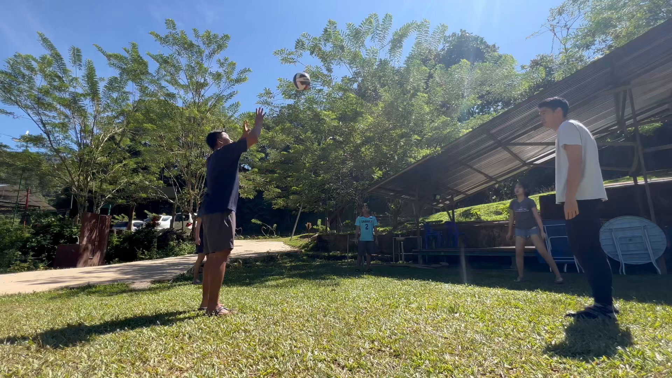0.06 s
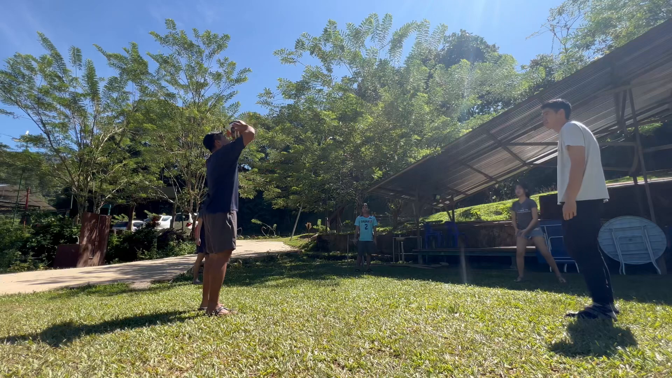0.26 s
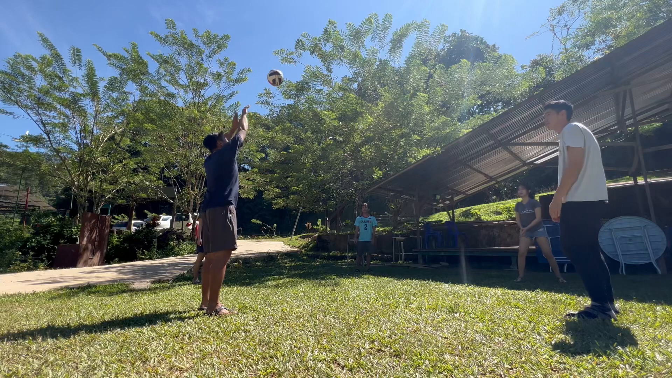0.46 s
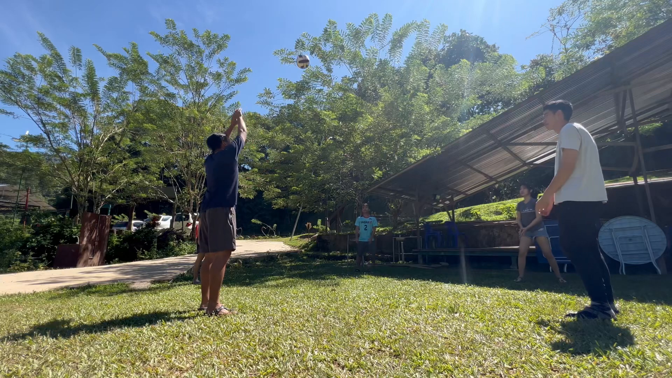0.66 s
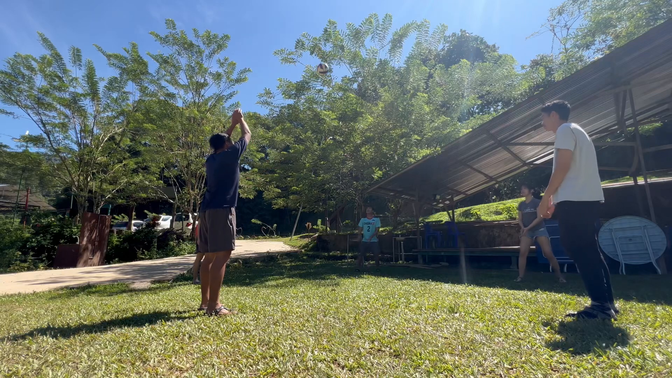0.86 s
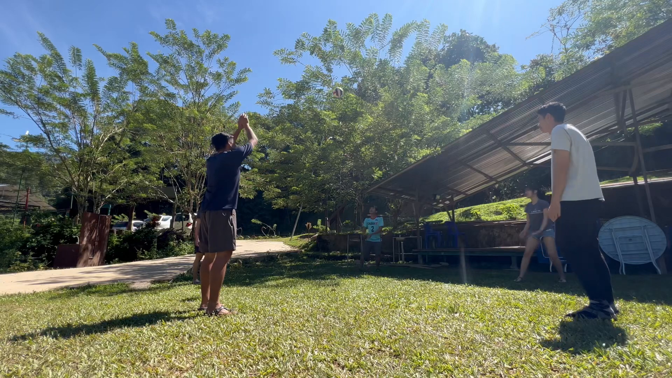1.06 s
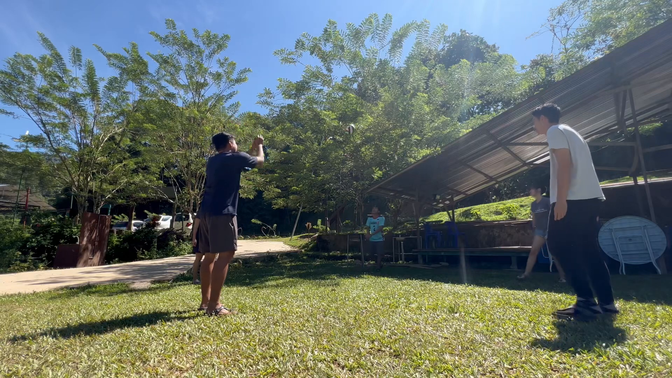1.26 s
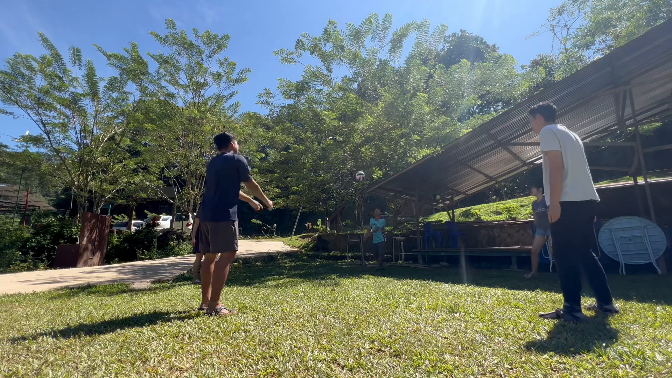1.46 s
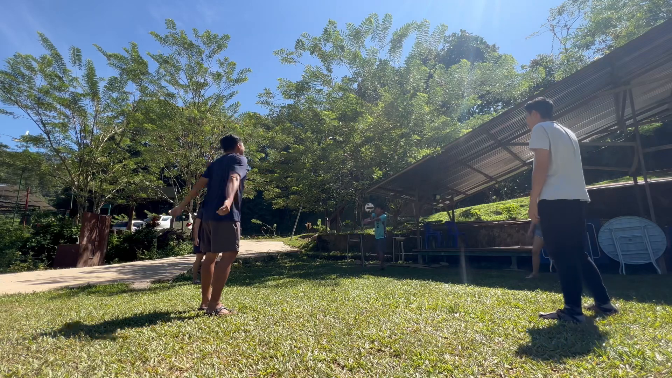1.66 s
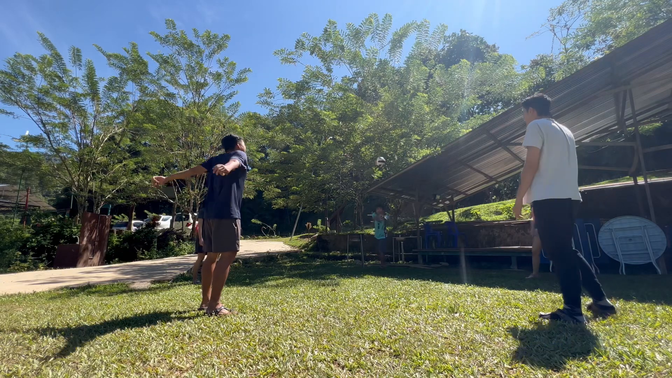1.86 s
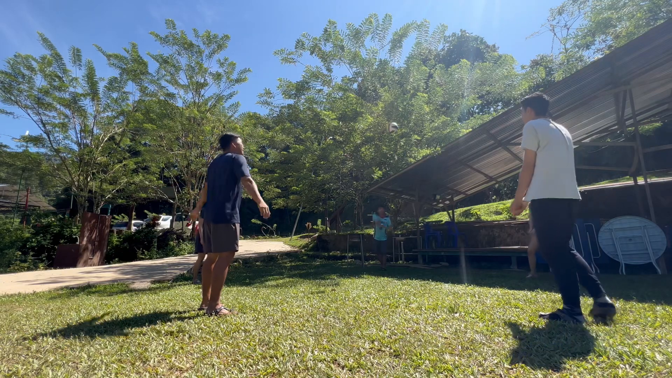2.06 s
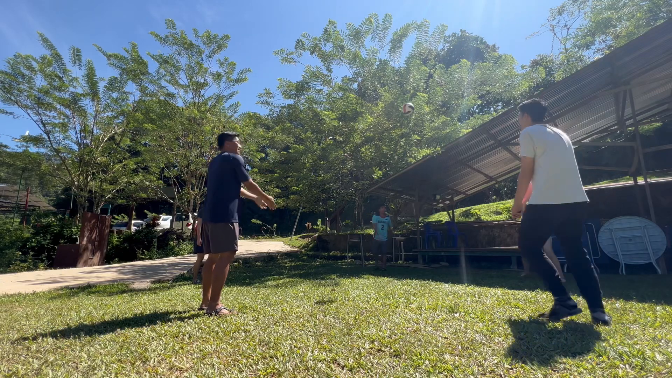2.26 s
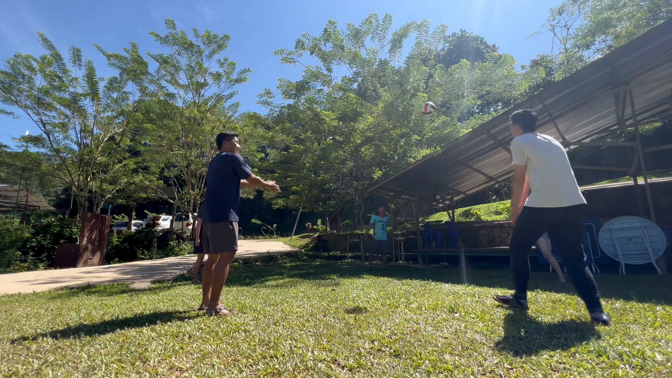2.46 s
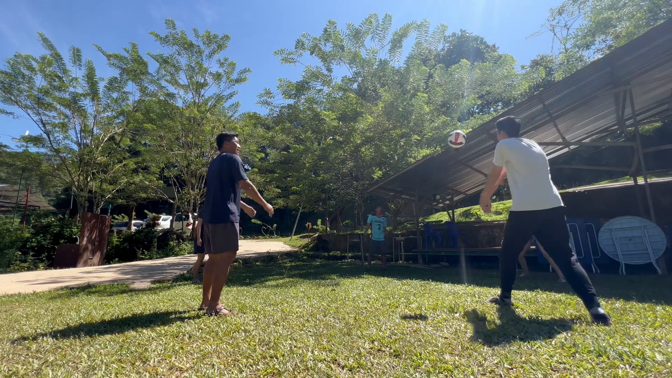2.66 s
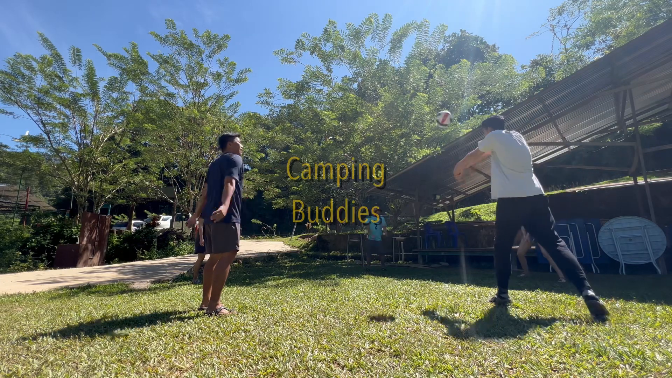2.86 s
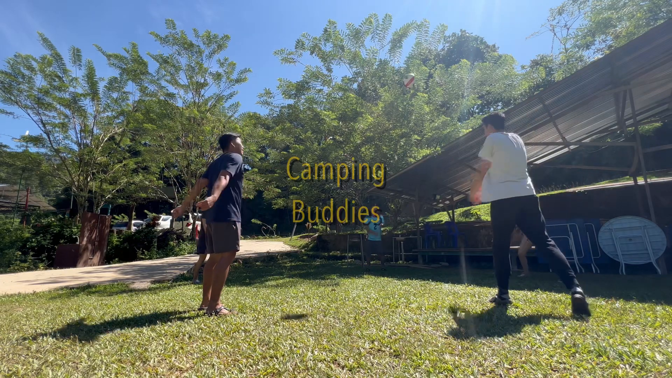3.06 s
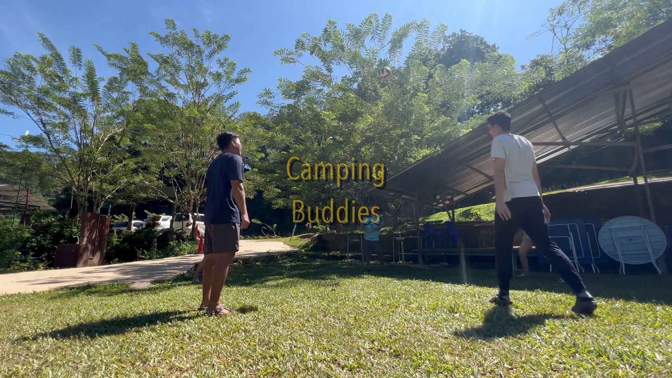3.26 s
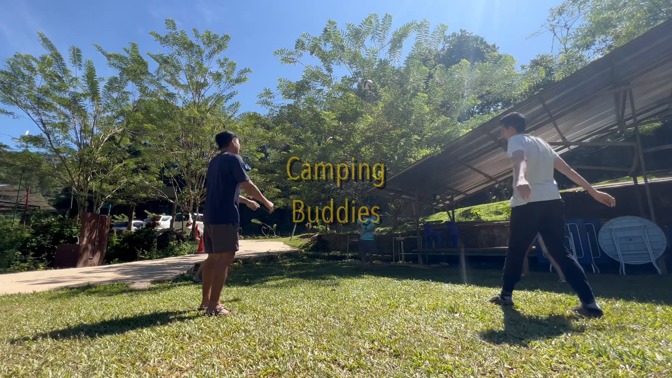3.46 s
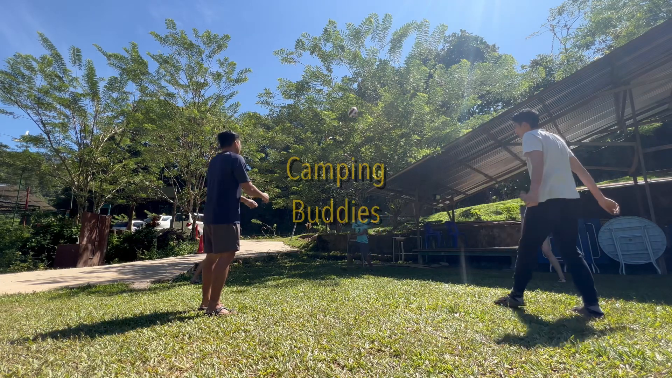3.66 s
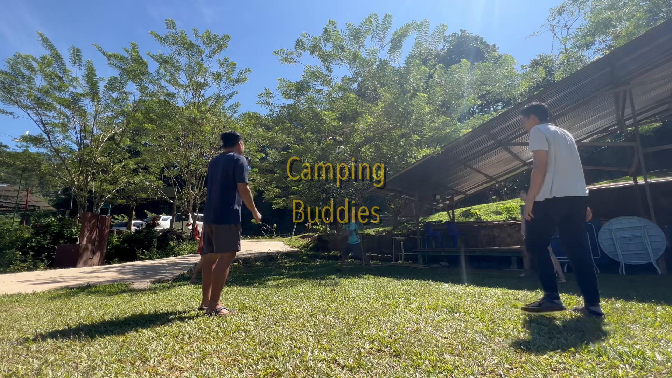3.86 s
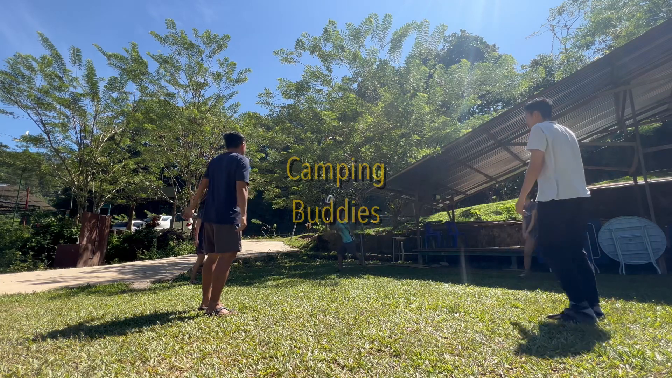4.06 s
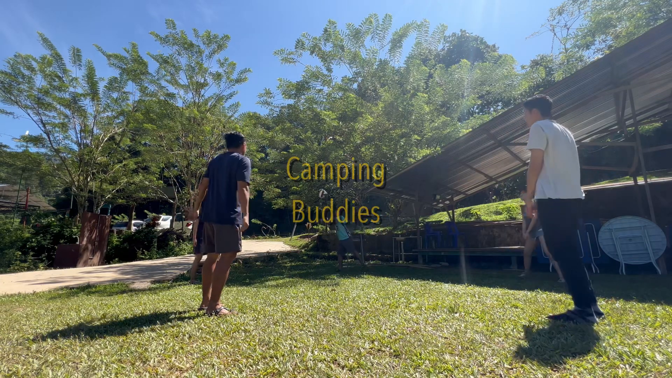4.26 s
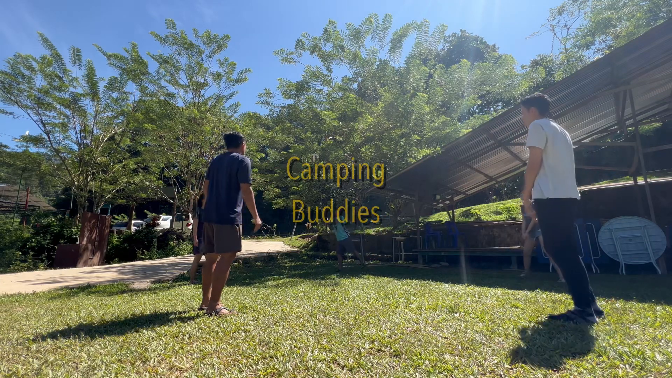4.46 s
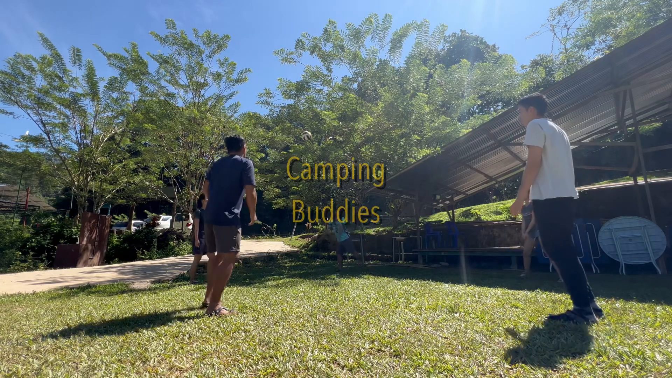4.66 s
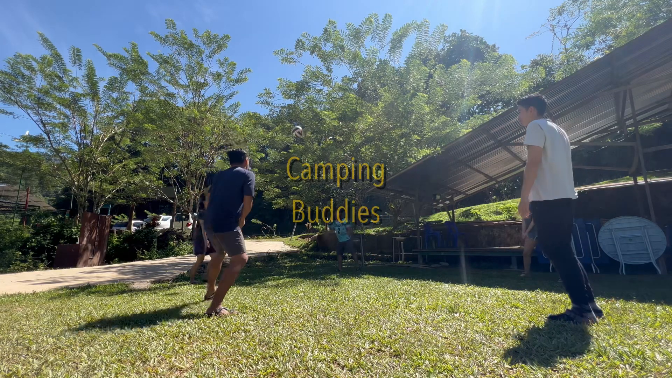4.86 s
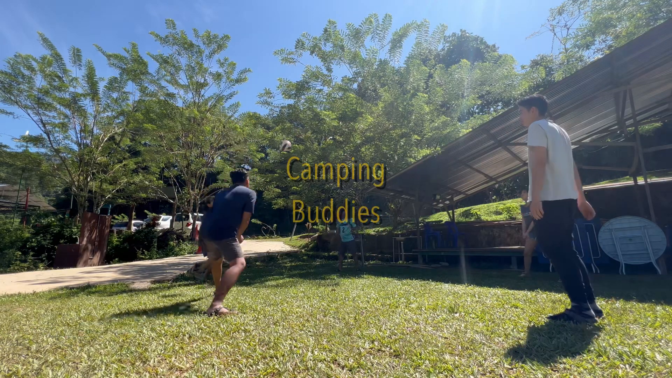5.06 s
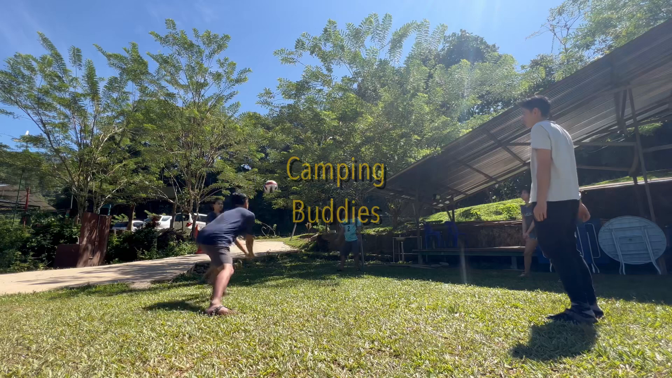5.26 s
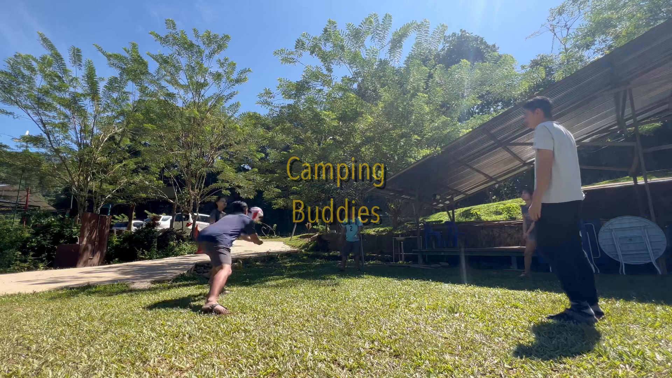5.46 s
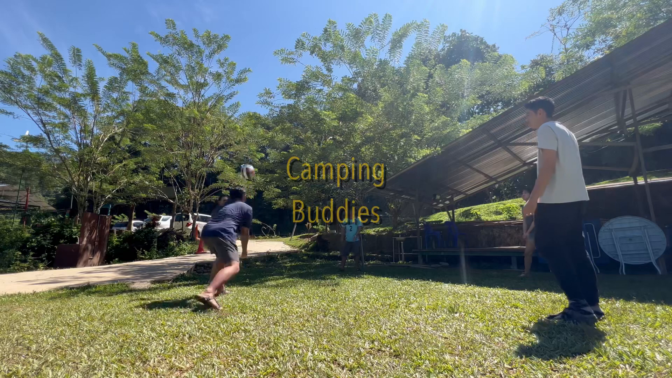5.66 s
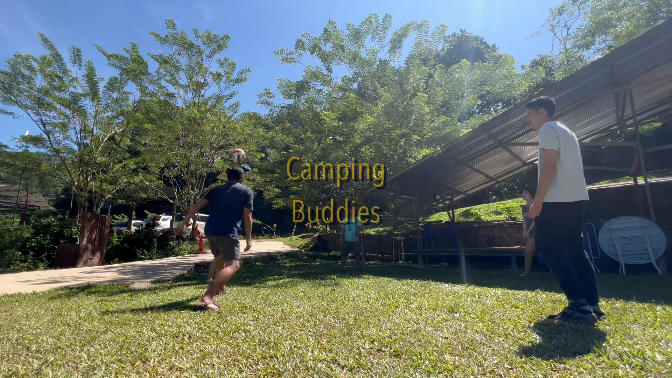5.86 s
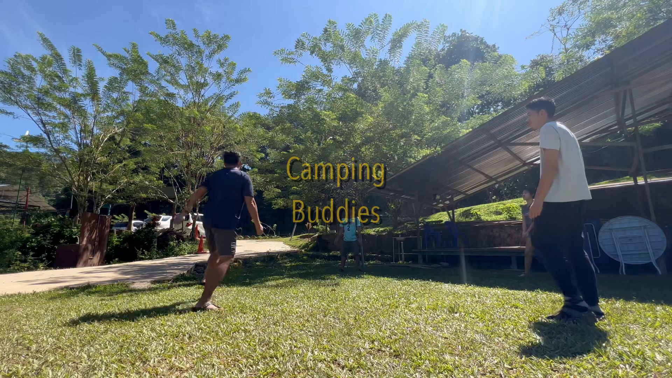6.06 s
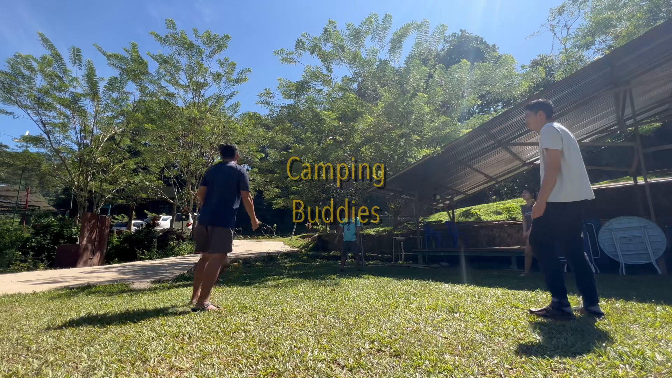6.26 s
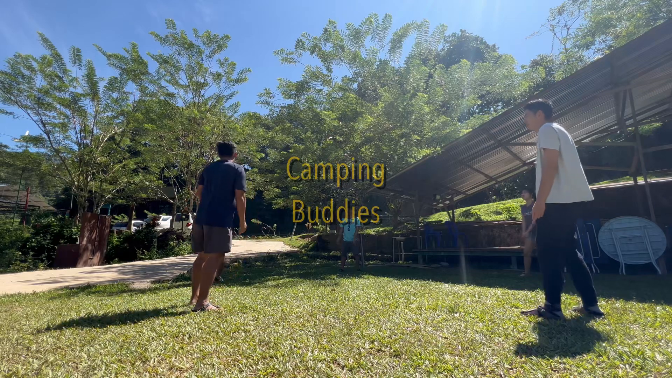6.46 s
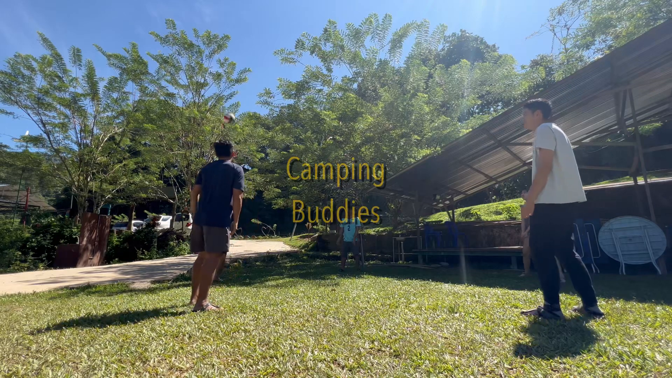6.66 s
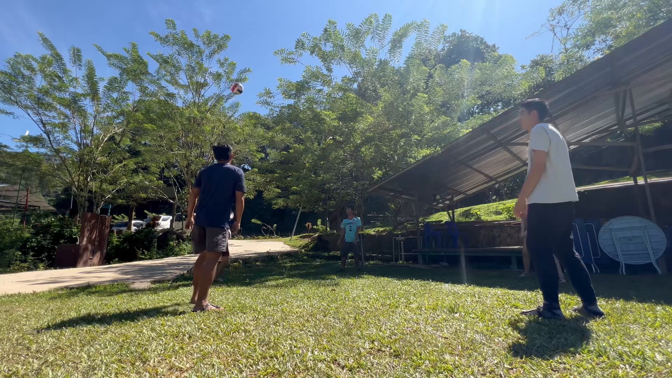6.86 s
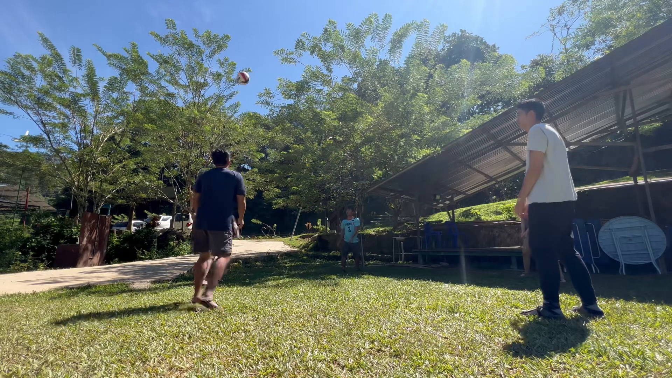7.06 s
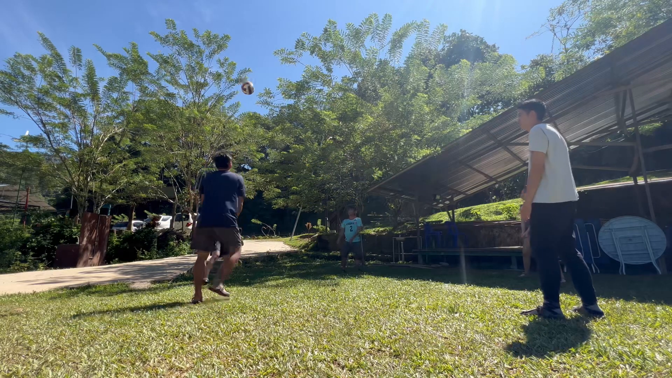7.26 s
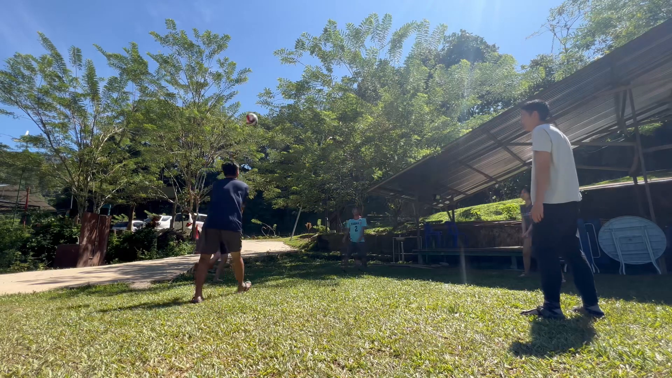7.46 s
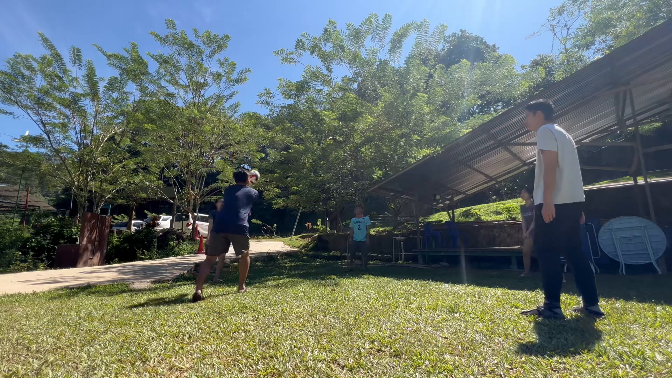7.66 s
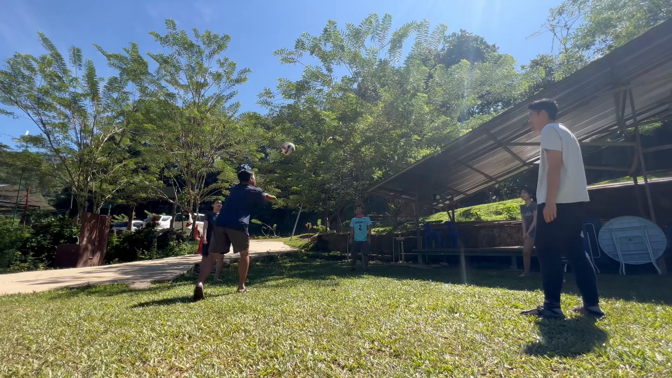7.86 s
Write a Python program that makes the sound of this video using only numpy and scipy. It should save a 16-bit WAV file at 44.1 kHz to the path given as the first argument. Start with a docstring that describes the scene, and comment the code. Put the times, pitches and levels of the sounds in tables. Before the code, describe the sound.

Outdoors on a lawn, a volleyball gets a soft fingertip set, then six forearm bumps roughly a second or more apart, moving between centre, right and left. Each is a crisp skin slap with a deep, quickly falling thump and brief ring, answered by a roof and trees. Faint hand pats and grass ticks fall between. A high insect chorus with a fast cricket pulse and soft distant rush continue throughout, in stereo from a few metres.

```python
"""On a lawn, a volleyball is bumped round a ring of players: each blow is a skin slap, made of short noise
bursts, and the ball's deep thump, a few cycles falling in pitch. A slanted roof and the trees answer.
One soft overhead set opens the rally; hands pat and feet tick in the grass between blows.
Behind them a bush cricket pulses over a high insect chorus, a thin steady whine and a soft, distant
rush of shaped noise that reaches the left microphone first."""
import sys
import numpy as np
from scipy import signal
from scipy.fft import rfft, irfft, next_fast_len
from scipy.io import wavfile
from scipy.ndimage import map_coordinates

SR = 44100
rng = np.random.default_rng(int(sys.argv[2]) if len(sys.argv) > 2 else 0)


def int16_out(signal):
    """Quantize to a 16-bit WAV file."""
    q = np.round(np.clip(np.atleast_2d(signal).T, -1, 1) * 32767)
    wavfile.write(sys.argv[1], SR, q.astype(np.int16))


N = 348390  # length [samples]


def amp(db):
    """Decibels to an amplitude factor."""
    return 10 ** (np.asarray(db) / 20)


def unit(x):
    """Scale to rms 1 over all channels together."""
    return x / np.sqrt(np.mean(x ** 2) + 1e-20)


def along(points, hz):
    """Read a curve of (frequency [Hz], value) points on a log frequency axis."""
    point_hz, values = np.transpose(points)
    return np.interp(np.log(hz + 1), np.log(point_hz + 1), values)


def wobble(rate):
    """A smooth random curve with rate knots a second."""
    knots = rng.standard_normal(int(N * rate / SR) + 4)
    return map_coordinates(knots, [np.arange(N) * rate / SR])


def filtered(x, response):
    """Multiply the spectrum of x by a (complex) response of frequency."""
    n = x.shape[-1]
    padded = next_fast_len(n + SR // 2)
    spectrum = rfft(x, padded) * response(np.fft.rfftfreq(padded, 1 / SR))
    return irfft(spectrum, padded)[..., :n]


def band(x, low_hz, high_hz, order=2):
    """Causal band-pass."""
    edges = [low_hz, np.clip(high_hz, low_hz + 20, SR / 2 - 20)]
    return signal.sosfilt(signal.butter(order, edges, 'band', fs=SR, output='sos'), x)


def burst(envelope, low_hz, high_hz, order=2):
    """A puff of band noise, evened in colour, with the energy of 10 ms at rms 1."""
    n = len(envelope)
    spectrum = rfft(envelope * rng.choice([-1, 1], n), 2 * n)
    even = irfft(spectrum / (abs(spectrum) + 1e-9) ** .8)[:n]
    puff = band(even, low_hz, high_hz, order=order)
    return puff / np.linalg.norm(puff) * np.sqrt(SR / 100)


RIGHT_MIC_DB = 1  # the right microphone is this much over the mean, the left this much under


def add(out, s, x, side, lead=0.00032, pan_db=5.0):
    """Place a sound at time s: the nearer microphone hears it sooner (lead [s]) and louder."""
    ears = np.array([[-1], [1]])  # left, right
    gain = amp((pan_db * side + RIGHT_MIC_DB) * ears)
    pair = filtered(x, lambda hz: gain * np.exp(1j * np.pi * hz * lead * side * ears))
    start = round(s * SR)
    out[:, start:start + pair.shape[1]] += pair[:, :N - start]


AIR_DB, AIR_DRIFT_DB, AIR_FLUTTER_DB = -47.5, -0.04, 0.34  # level, its slow and quick wavering
# colour of the distant rush: (frequency [Hz], relative level [dB])
RUSH_COLOUR = [(15, -45), (25, -18), (65, -2.5), (172, -5.5), (233, -3), (339, -3), (539, -6), (592, -6.5),
               (649, -8), (730, -11.5), (1110, -14.5), (1340, -13.5), (2340, -20), (2810, -23), (6500, -26),
               (8450, -24), (14300, -120)]
# how it meets the microphones: (frequency [Hz], likeness of the two [-1 to 1], lead of the left [rad])
RUSH_FIELD = [(60, 0.15, .1), (120, 0.98, 0.25), (240, 0.36, 1.1), (483, 0.83, 2.27), (1070, 0.68, 3.62),
              (1930, 0.32, 4.42), (3580, 0.019, 7.15)]
# its lean to one side: (frequency [Hz], left minus right level [dB])
RUSH_BALANCE = [(60, -2), (180, -3), (550, 2), (1650, 2), (4970, 2.5), (15000, 10)]


def air():
    """A distant rush: two noises mixed so that the microphones agree more or less at each frequency."""
    field = np.array(RUSH_FIELD)
    likeness, left_lead = field[:, [0, 1]], field[:, [0, 2]]

    def mid_and_side(hz):
        turn = np.arccos(np.clip(along(likeness, hz), -1, 1)) / 2
        return amp(along(RUSH_COLOUR, hz)) * [np.cos(turn), np.sin(turn)]

    half = np.array([[.5], [-.5]])  # each microphone takes half of the difference

    def lean(hz):
        return amp(half * along(RUSH_BALANCE, hz)) * np.exp(1j * half * along(left_lead, hz))

    mid, side = filtered(rng.standard_normal((2, N)), mid_and_side)
    pair = filtered(np.array([mid + side, mid - side]), lean)
    return unit(pair) * amp(AIR_DB + AIR_DRIFT_DB * wobble(1.86) + AIR_FLUTTER_DB * wobble(5.1))


# colour of the far insects: (frequency [Hz], relative level [dB])
CHORUS_COLOUR = [(5500, -65), (6750, -39), (7080, 6.5), (7400, 9), (7650, 3), (7880, -17), (8030, -2),
                 (8200, -17), (8650, -11), (9450, -6), (10400, -19), (13300, -12), (15800, -19)]


def chorus(db=-61, octave_hz=15050, octave_width_hz=420, octave_db=-76):
    """Many far insects blur into a high, shimmering band of noise with a weak octave."""
    hiss = unit(filtered(rng.standard_normal((2, N)), lambda hz: amp(along(CHORUS_COLOUR, hz))))
    octave_band = lambda hz: np.exp(-((hz - octave_hz) / octave_width_hz) ** 2 / 2)
    octave = unit(filtered(rng.standard_normal(N), octave_band))
    shimmer = amp(1.1 * wobble(170) + .3 * wobble(2))
    return (amp(db) * hiss + amp(octave_db) * octave) * shimmer


WHINE_DB = -66


def whine(hz=7570, width_hz=40):
    """One insect, louder on the left, holds a narrow, steady note made of narrow-band noise."""
    note = filtered(rng.standard_normal((2, N)), lambda f: np.exp(-((f - hz) / width_hz) ** 2 / 2))
    return amp(WHINE_DB) * unit(unit(note) * amp([[2], [-3]]))


CRICKET_DB = -60
# wing strokes of one chirp: (time [s], level [dB])
WING_STROKES = [(0, -5.5), (.0112, 0), (.0224, -1), (.0336, -10)]


def cricket(centre_hz=7620, fall_hz=400):
    """Chirps of four wing strokes; the tone slides down within each stroke and leaves blur it."""
    chirp_rate, first = 20.78, .011  # chirps a second, start [s]
    stroke, leaves = .0025, .5  # stroke width [s], share of the blur
    clock = np.arange(N) / SR + .001 * wobble(5.3)
    song = np.zeros(N)
    for offset, stroke_db in WING_STROKES:
        # time from the nearest stroke, in chirp periods and then in stroke widths
        since = ((clock - first - offset + 0.0005 * wobble(18)) * chirp_rate + .5) % 1 - .5
        u = since / chirp_rate / stroke
        hz = centre_hz - fall_hz * np.clip(u, -2, 2) + 110 * wobble(220)
        tone = np.sin(2 * np.pi * np.cumsum(hz) / SR)
        song += amp(stroke_db + 1.3 * wobble(25)) * np.exp(-u ** 2) * tone
    t = np.arange(SR // 30) / SR
    scatter = rng.standard_normal((2, len(t))) * np.exp(-t / .005)
    blur = signal.fftconvolve(song[None], scatter, axes=1)[:, :N]
    return amp(CRICKET_DB) * unit((unit(song) + leaves * unit(blur)) * amp([[2], [-2]]))


# how long the yard rings: (frequency [Hz], t60 [s])
YARD_RING = [(60, 0.48), (125, 0.47), (300, 0.34), (1200, 0.24), (4000, 0.4), (12000, 0.37)]
# colour of its answer: (frequency [Hz], level [dB])
YARD_TINT = [(40, -27), (75, -7), (125, -0.5), (220, 1), (500, 6.5), (1200, 3), (2500, -5.5), (6000, 3.5),
             (14000, 4.5)]


def yard(x):
    """Trees and grass scatter a sound into a short, ever different stereo tail of decaying noise."""
    hz, t, grains = signal.stft(rng.standard_normal((2, SR // 2)), SR, nperseg=256)
    decay = amp(-60 * t / along(YARD_RING, hz)[:, None])
    tail = signal.istft(grains * decay, SR, nperseg=256)[1]
    tail *= 1 - np.exp(-np.arange(tail.shape[1]) / SR / 0.00053)  # soft onset
    # long waves reach both microphones alike
    spread = lambda f: amp(along(YARD_TINT, f)) * [np.ones_like(f), f / (f + 350)]
    mid, side = filtered(tail / np.linalg.norm(tail[0]), spread)
    return signal.fftconvolve(x[None], np.array([mid + side, mid - side]), axes=1)[:, :N]


PAT_SWELL_S, PAT_SPREAD = .0013, 1.34  # rise time; factor below and above the centre
PALM_DB, PALM_RATIO = -10.5, .42  # the fleshy part of a pat: level and pitch against the slap
# hand pats: (time [s], level [dB], centre [Hz], side [-1 left to 1 right])
HAND_PATS = [(2.353, -44.5, 2340, 0.41), (3.158, -54, 1400, 0.68), (6.797, -57, 1300, -.33)]
# grass blades snapping underfoot: (time [s], level [dB], side [-1 left to 1 right])
GRASS_TICKS = [(.27, -56, -0.47), (3.071, -58, .5), (6.084, -50, -0.5)]


def small_sounds():
    """Hands pat with a slap and a duller palm; grass snaps in very short bright bursts."""
    out, t = np.zeros((2, N)), np.arange(SR // 8) / SR
    swell = t * np.exp(-t / PAT_SWELL_S)
    puff = lambda hz: burst(swell, hz / PAT_SPREAD, hz * PAT_SPREAD, order=3)
    for s, db, hz, side in HAND_PATS:
        add(out, s, amp(db) * (puff(hz) + amp(PALM_DB) * puff(hz * PALM_RATIO)), side)
    for s, db, side in GRASS_TICKS:
        add(out, s, amp(db) * burst(t * np.exp(-t / 0.0008), 2200, 10800), side)
    return out


SET_S, SET_DB = .245, -39  # time, level
# where the players stand, by name: (side [-1 left to 1 right], roof echo delay [s],
# bright peak of the cover on their arms [dB])
RING_OF_PLAYERS = {"far": (0.084, 0.024, 9.6), "right": (0.645, .042, -4), "left": (-0.47, .045, -7)}


def overhead_set():
    """The left player's fingertips brush and cushion the ball; a faint thud follows a moment later."""
    out, t = np.zeros((2, N)), np.arange(SR // 8) / SR
    side = RING_OF_PLAYERS["left"][0]
    touch = t ** 2 * np.exp(-t / 0.0047)
    fingers = burst(touch, 400, 1900, order=5) + amp(-11) * burst(touch, 3800, 8900)
    thud = burst(t * np.exp(-t / .0095), 64, 180, order=3)
    add(out, SET_S, amp(SET_DB) * fingers, side)
    add(out, SET_S + 0.0099, amp(SET_DB + .5) * thud, side)
    return out


ROOF_NEAR_S, ROOF_BOOM_DB, ROOF_SLAP_DB = 0.022, -8, -13.5  # reference delay and the levels there
BOOM_LOSS_DB, SLAP_LOSS_DB = 11, 22  # lost for each doubling of the echo's delay
TREES_S, TREES_DB = .145, -33.5  # echo off the far tree line


def echoes(skin, body, delay):
    """The space under the roof booms, its struts scatter the slap; the far trees return only the bass."""
    t = np.arange(len(skin)) / SR
    farther = np.log2(delay / ROOF_NEAR_S)  # doublings of the delay
    boom = band(body, 104.6, 155)
    boom *= np.linalg.norm(body) / np.linalg.norm(boom)
    struts = rng.standard_normal(len(t)) * np.exp(-t / 0.016)
    scatter = signal.fftconvolve(skin, struts)[:len(t)]
    scatter *= np.linalg.norm(skin) / np.linalg.norm(scatter)
    roof_boom = amp(ROOF_BOOM_DB - BOOM_LOSS_DB * farther) * boom
    roof_slap = amp(ROOF_SLAP_DB - SLAP_LOSS_DB * farther) * scatter
    return roof_boom + roof_slap, amp(TREES_DB) * boom


def contact(t, second, swell, share=0.61):
    """The ball meets one forearm, then (second [s] later) the other, more weakly."""
    u = np.maximum([t, t - second], 0) / swell
    first_arm, second_arm = u ** 2 * np.exp(-u)
    return first_arm + share * second_arm


FIRM_DB = -8  # strength of an ordinary firm blow
SLAP_SPREAD = 1.434  # the slap reaches this factor below and above its centre
# level at a firm blow, dB gained per dB of strength, lower edge
CRACK_DB, CRACK_GROWS, CRACK_LOW_HZ = -32, 2, 2280
# air trapped between the arms: level at a firm blow, dB gained per dB of strength, ring
HOLLOW_DB, HOLLOW_GROWS, HOLLOW_T60_S = -18, 4.1, 0.026
RELEASE_S, RELEASE_DB = 0.0098, -27  # the ball peels off the skin: delay, level against the blow


def forearms(t, pressed, db, slap_db, slap_hz, crack_hz, hollow_hz, second, cover_db):
    """Slap, skin crack, hollow pop between the arms, and release; harder blows crack and pop far more."""
    harder_db = db - FIRM_DB
    slap_touch = contact(t, second, swell=0.00039)
    slap = amp(slap_db) * burst(slap_touch, slap_hz / SLAP_SPREAD, slap_hz * SLAP_SPREAD, order=4)
    crack_touch = contact(t, second, swell=0.00033)
    crack = burst(crack_touch, CRACK_LOW_HZ, crack_hz, order=1)
    crack = amp(CRACK_DB + CRACK_GROWS * harder_db) * crack
    crack = crack + amp(cover_db) * band(crack, 3300, 3800, order=1)  # the taut cover adds a bright peak
    hollow_level = amp(HOLLOW_DB + HOLLOW_GROWS * harder_db - 60 * pressed / HOLLOW_T60_S)
    hollow = hollow_level * np.sin(2 * np.pi * hollow_hz * pressed)
    flesh = amp(db - 30) * burst(t * np.exp(-t / 0.0032), 280, 1700)
    peeling = np.maximum(t - RELEASE_S, 0)
    release = burst(peeling * np.exp(-peeling / 0.0036), 220, 1050, order=3)
    return slap + crack + hollow + flesh + amp(db + RELEASE_DB) * release


def thump(t):
    """The ball squashes and springs back: a few cycles that fall in pitch."""
    start_hz, end_hz, glide = 353, 68, .0077  # glide: time constant [s]
    crest, sharpness = .0154, 6  # time of the loudest point [s]; power of the swell
    cycles = end_hz * t + (start_hz - end_hz) * glide * (1 - np.exp(-t / glide))
    swell = (t / crest * np.exp(1 - t / crest)) ** sharpness
    return swell * np.cos(2 * np.pi * cycles)


def ringing(t, hz, db, t60):
    """One mode of the ball, pushed inward while the contact lasts."""
    return -amp(db - 60 * t / t60) * np.sin(2 * np.pi * hz * t) * (1 - np.exp(-t / .004))


SKIN_IN_YARD_DB, THUMP_IN_YARD_DB = -12.5, -13  # how much of the arms and of the ball the yard returns
# the ball's shell: (frequency [Hz], level against the blow [dB], t60 [s])
BALL_SHELL = (232, -6.7, .069)
# the ball's inner air: (frequency [Hz], level against the blow [dB], t60 [s])
BALL_AIR = [(985, -26, .06), (1324, -25, .05), (1750, -26, .04)]
# forearm blows: (time [s], strength [dB], slap level [dB], slap centre [Hz], top of the crack [Hz],
# hollow [Hz], delay of the second arm [s], player [name])
FOREARM_BLOWS = [(1.656, -8.5, -24.5, 1380, 9600, 490, 0.0025, "far"),
                 (2.7737, -7.5, -23, 1370, 13200, 575, 0.0044, "right"),
                 (4.1809, -10, -30, 1340, 7500, 590, 0.00273, "far"),
                 (5.4312, -8.5, -19.5, 1790, 3860, 437, 0.00085, "left"),
                 (6.3912, -11.5, -32.5, 1180, 5460, 463, .002, "left"),
                 (7.7454, -9, -31.5, 1016, 3300, 350, 0.0041, "left")]


def bumps():
    """Each blow: the arms, the thump and ring of the ball, then the answers of yard, roof and trees."""
    out, t = np.zeros((2, N)), np.arange(SR // 3) / SR
    pressed = np.maximum(t - .0007, 0)  # the ball gives way just after the first touch
    for s, db, slap_db, slap_hz, crack_hz, hollow_hz, second, player in FOREARM_BLOWS:
        side, delay, cover_db = RING_OF_PLAYERS[player]
        skin = forearms(t, pressed, db, slap_db, slap_hz, crack_hz, hollow_hz, second, cover_db)
        ring = sum(ringing(pressed, hz, db + level + rng.normal(0, 1), t60)
                   for hz, level, t60 in BALL_AIR)
        body = amp(db) * (thump(pressed) + ringing(pressed, *BALL_SHELL))
        roof, trees = echoes(skin, body, delay)
        add(out, s, skin + ring, side)
        add(out, s, body, side, pan_db=0)  # side does not change the level of long waves
        add(out, s, yard(amp(SKIN_IN_YARD_DB) * skin + amp(THUMP_IN_YARD_DB) * body), 0)
        add(out, s + delay, roof, .2)
        add(out, s + TREES_S, trees, -.2)
    return out


def scene():
    """The rally over the steady sounds of the garden; the yard answers the small sounds too."""
    background = air() + chorus() + whine() + cricket()
    small = overhead_set() + small_sounds()
    return background + small + amp(-8.0) * yard(small.mean(0)) + bumps()


TOP_HZ = 16000


def record(dry):
    """The microphone sheds the deepest bass, below about 35 Hz, and keeps nothing from TOP_HZ up."""
    return filtered(dry, lambda hz: (hz < TOP_HZ) * hz ** 6 / (hz ** 6 + 35 ** 6))


dry = scene()
out = record(dry)
int16_out(out)
```